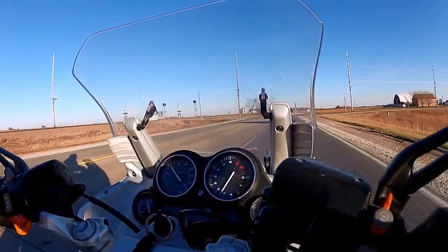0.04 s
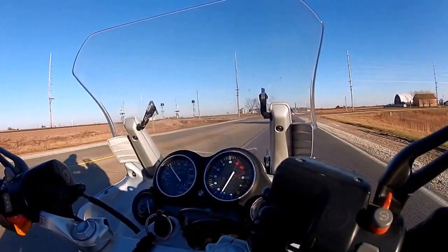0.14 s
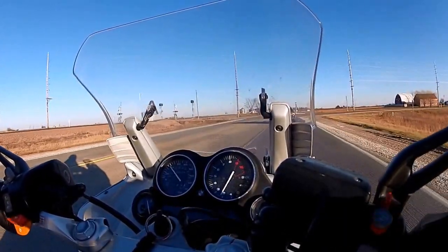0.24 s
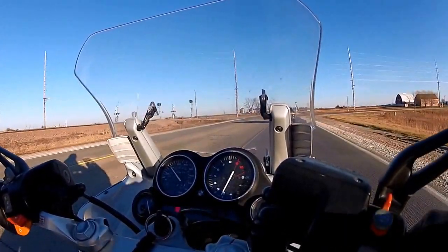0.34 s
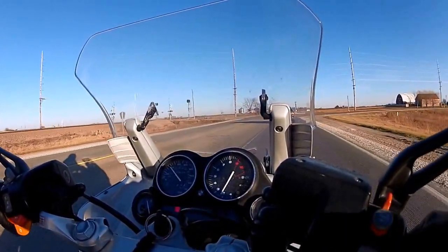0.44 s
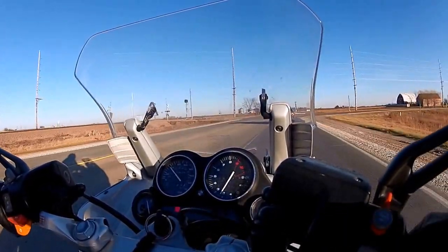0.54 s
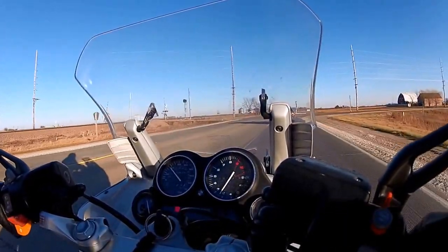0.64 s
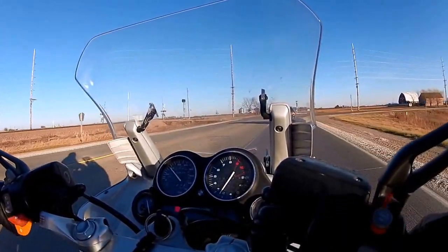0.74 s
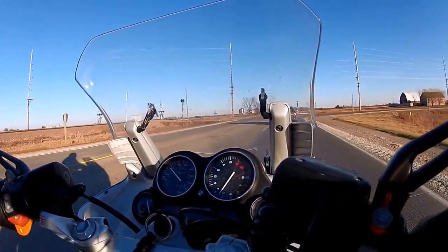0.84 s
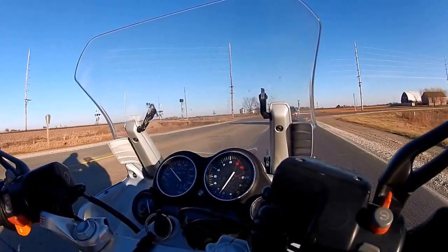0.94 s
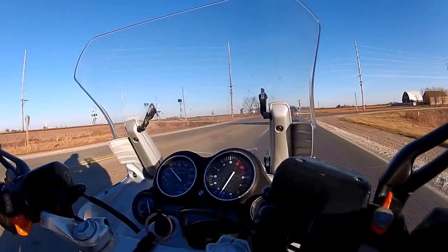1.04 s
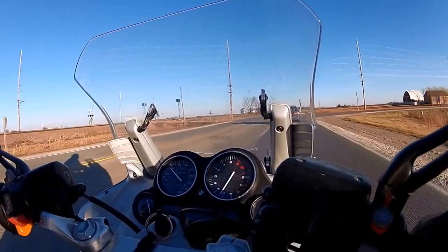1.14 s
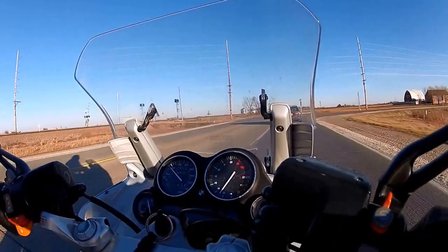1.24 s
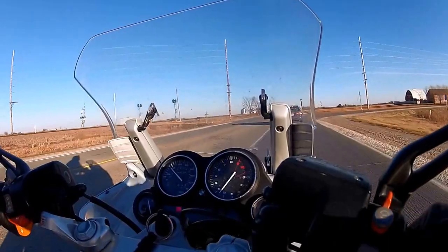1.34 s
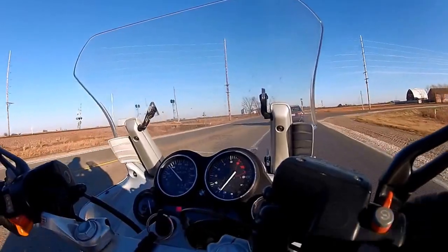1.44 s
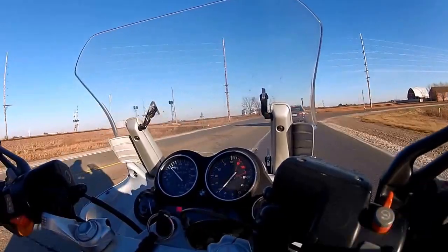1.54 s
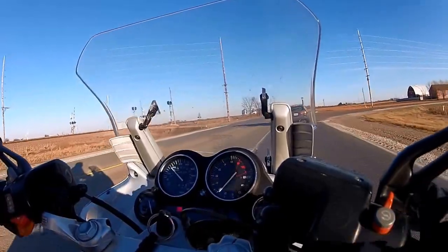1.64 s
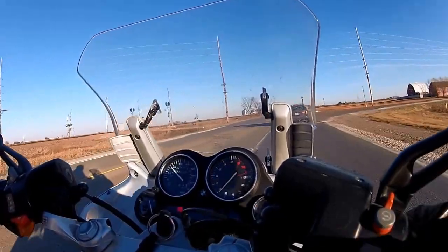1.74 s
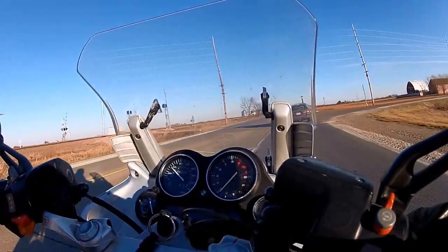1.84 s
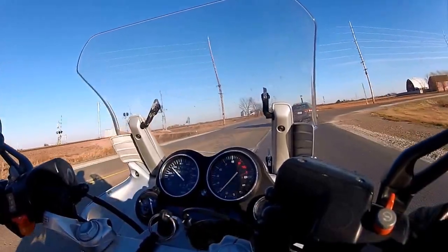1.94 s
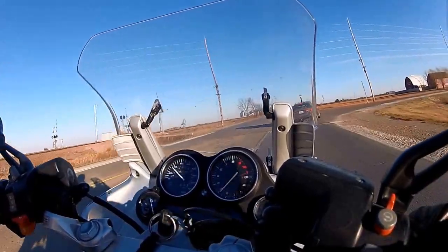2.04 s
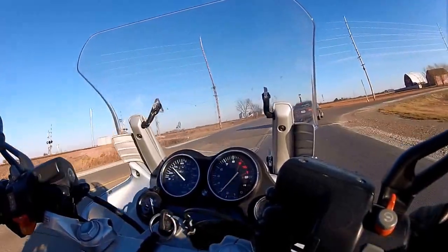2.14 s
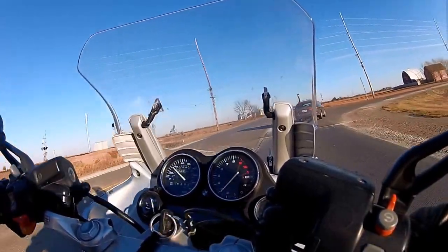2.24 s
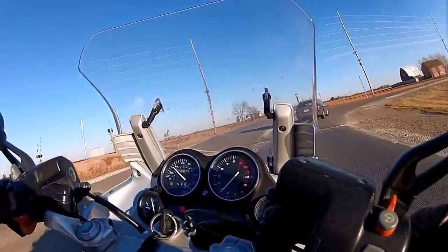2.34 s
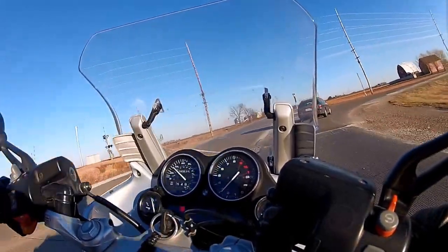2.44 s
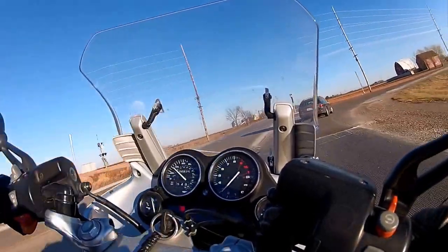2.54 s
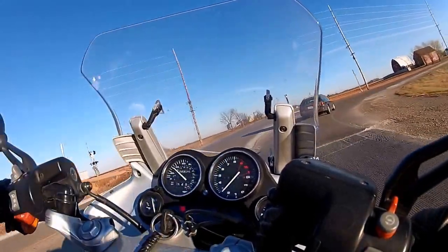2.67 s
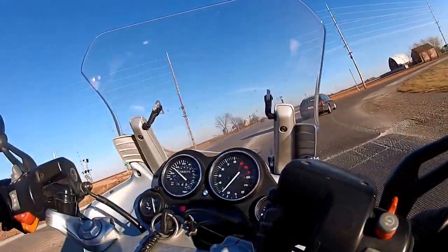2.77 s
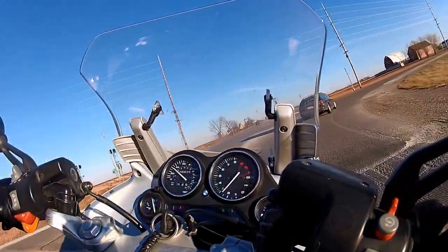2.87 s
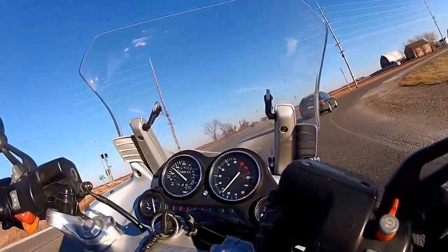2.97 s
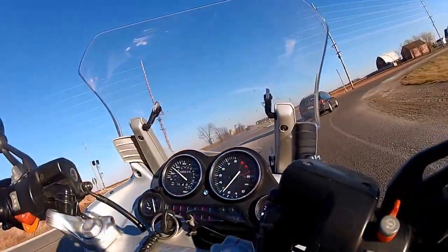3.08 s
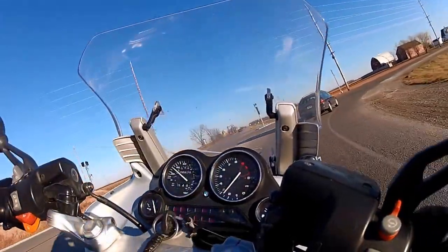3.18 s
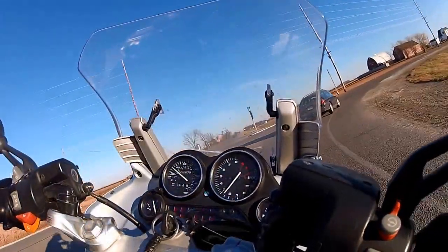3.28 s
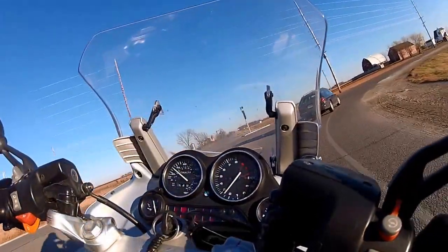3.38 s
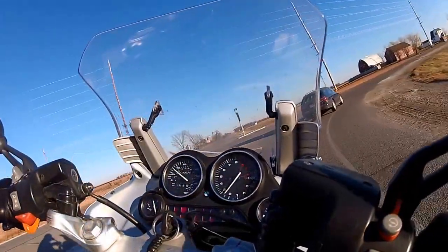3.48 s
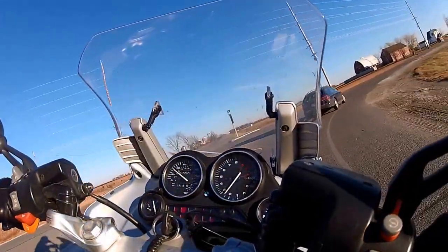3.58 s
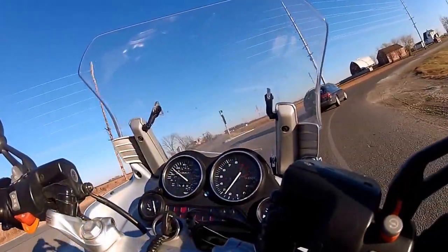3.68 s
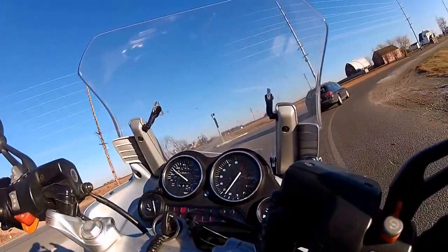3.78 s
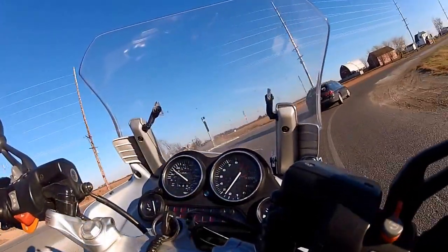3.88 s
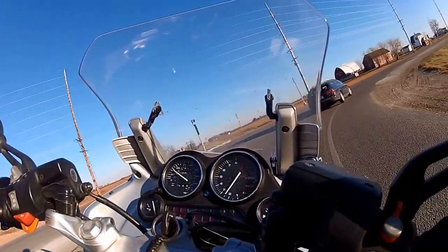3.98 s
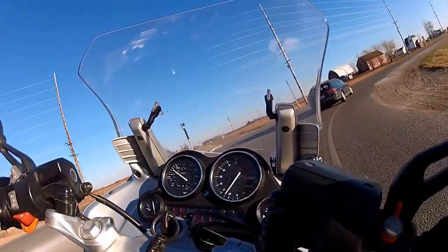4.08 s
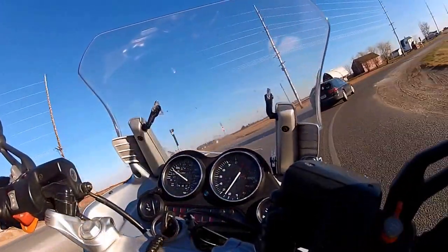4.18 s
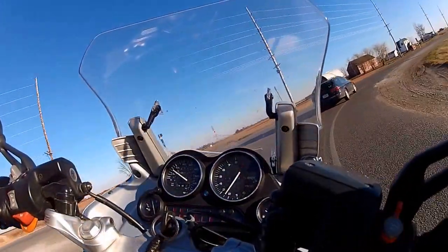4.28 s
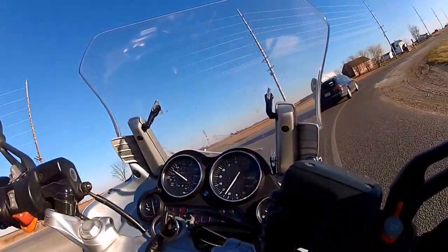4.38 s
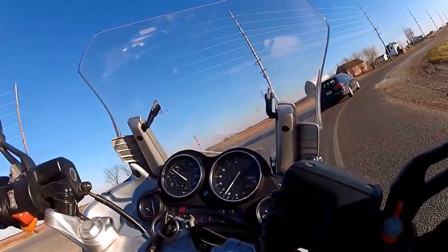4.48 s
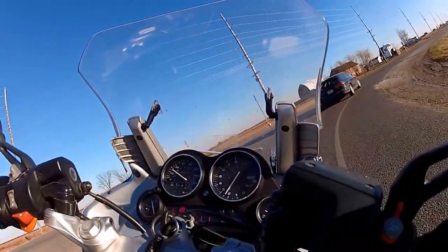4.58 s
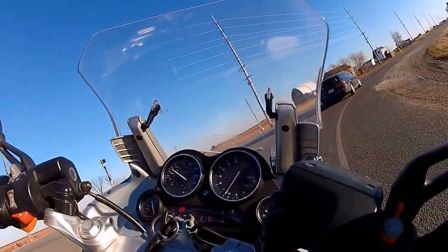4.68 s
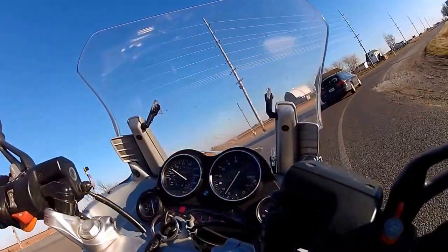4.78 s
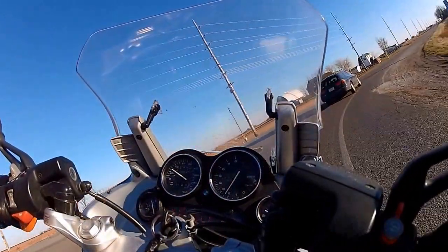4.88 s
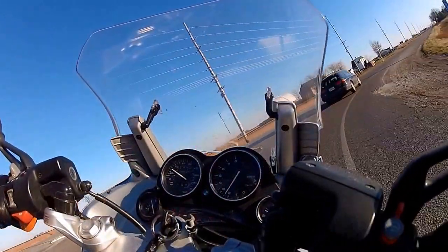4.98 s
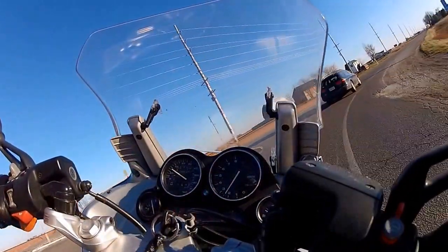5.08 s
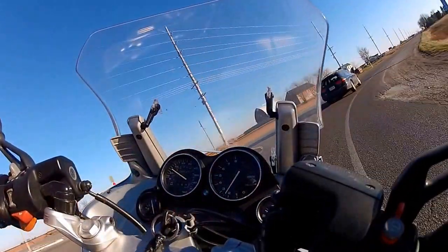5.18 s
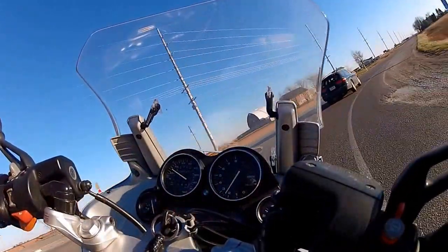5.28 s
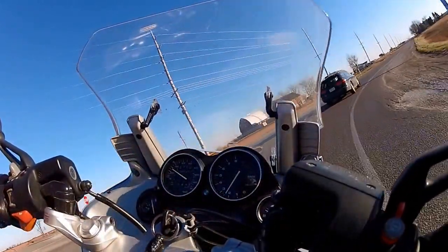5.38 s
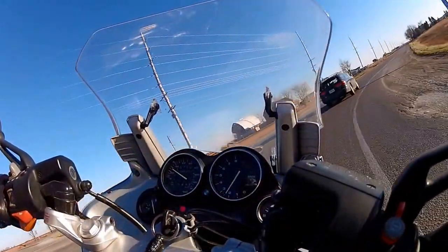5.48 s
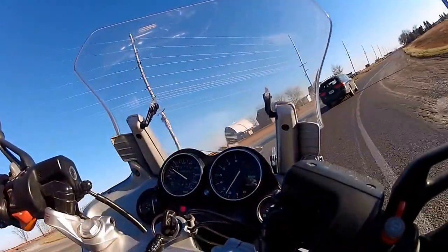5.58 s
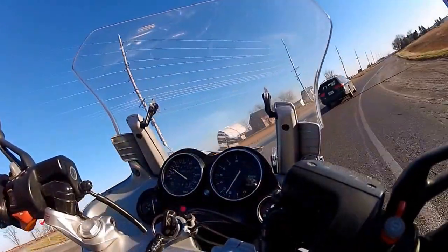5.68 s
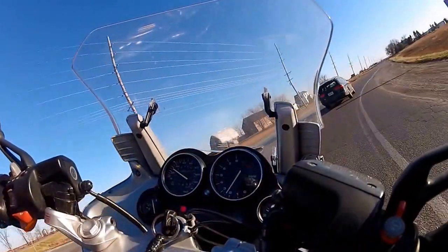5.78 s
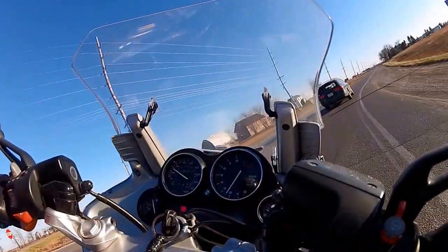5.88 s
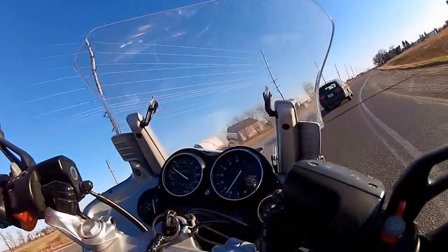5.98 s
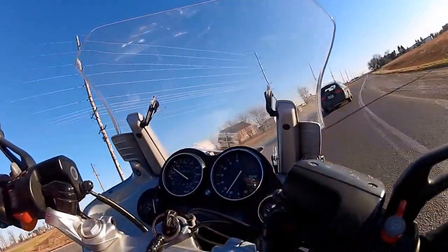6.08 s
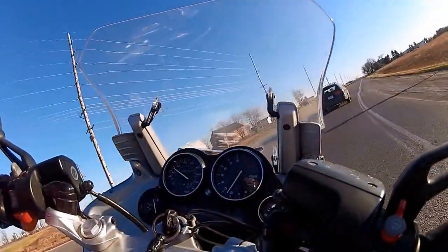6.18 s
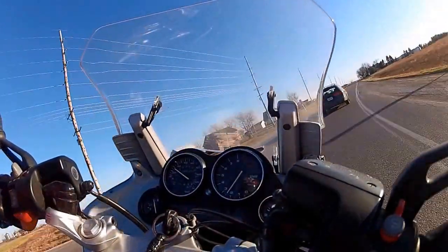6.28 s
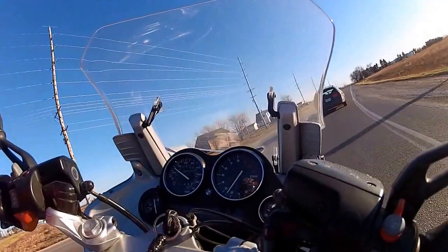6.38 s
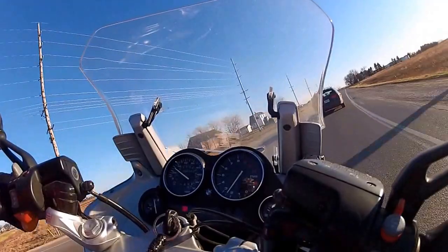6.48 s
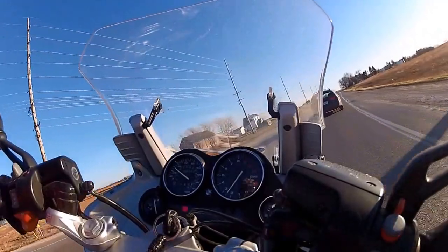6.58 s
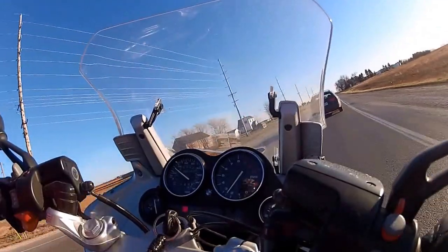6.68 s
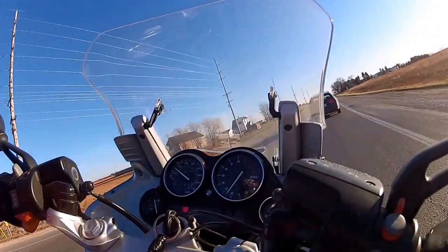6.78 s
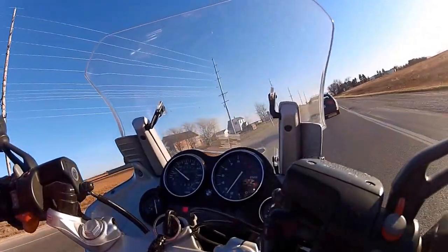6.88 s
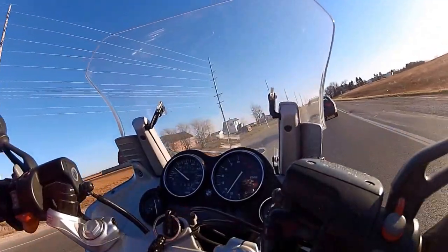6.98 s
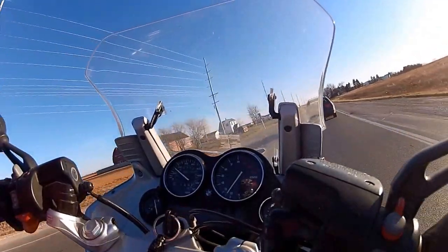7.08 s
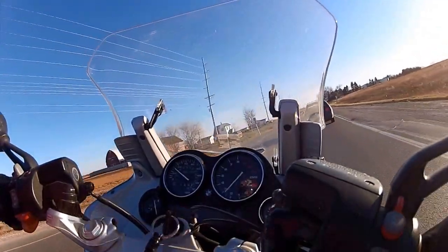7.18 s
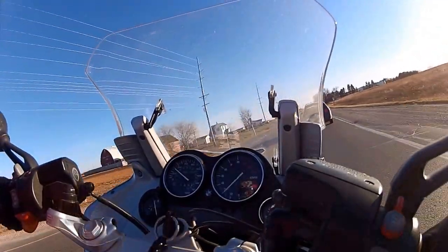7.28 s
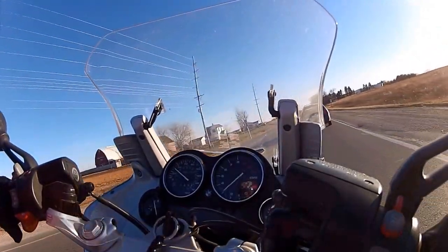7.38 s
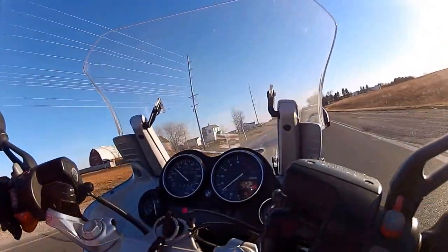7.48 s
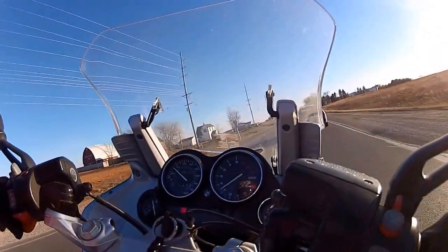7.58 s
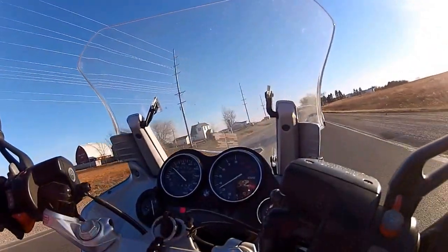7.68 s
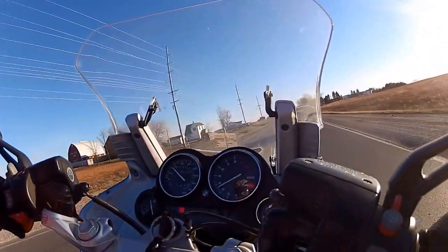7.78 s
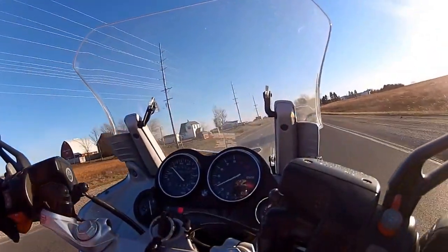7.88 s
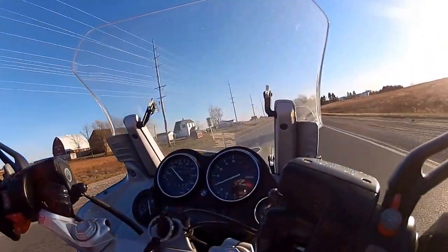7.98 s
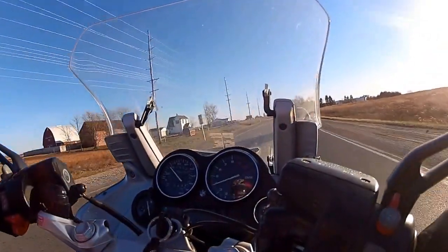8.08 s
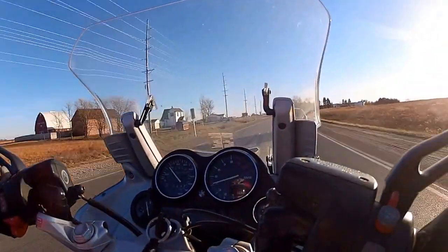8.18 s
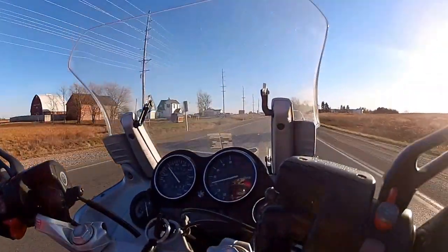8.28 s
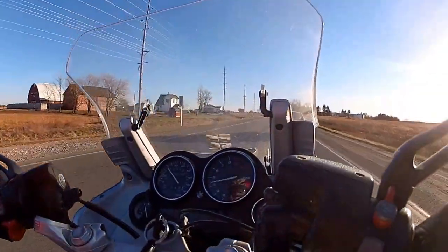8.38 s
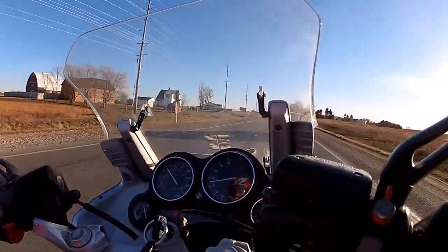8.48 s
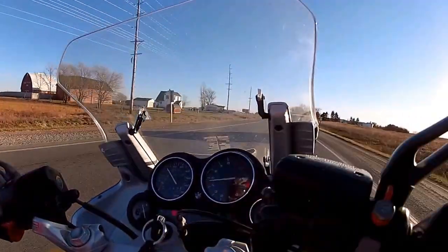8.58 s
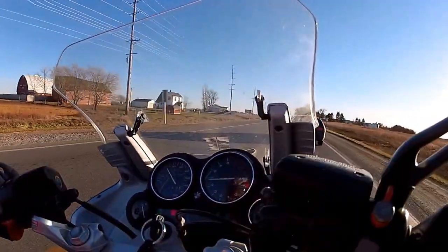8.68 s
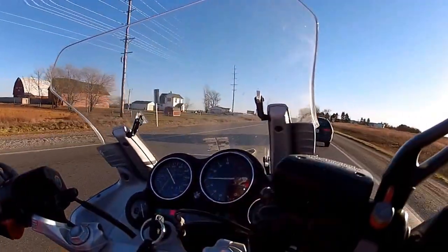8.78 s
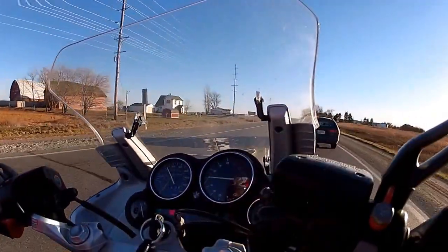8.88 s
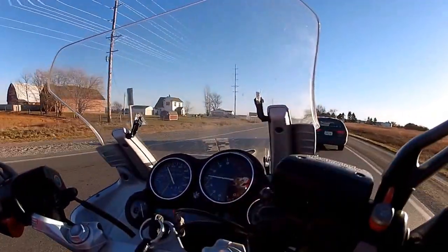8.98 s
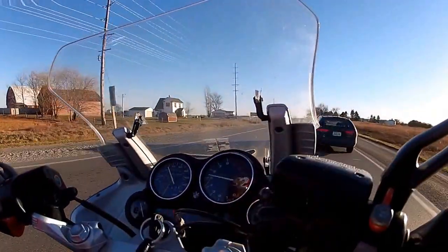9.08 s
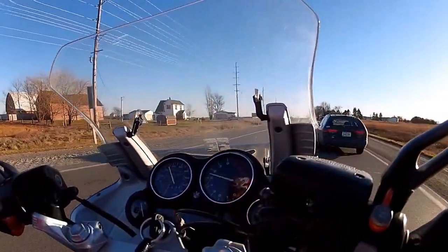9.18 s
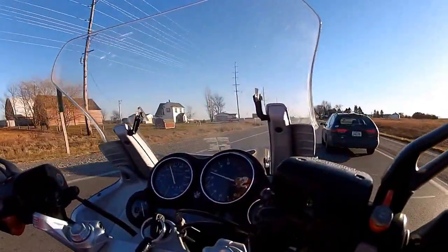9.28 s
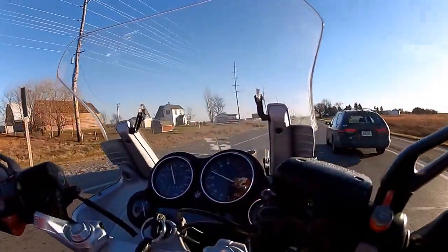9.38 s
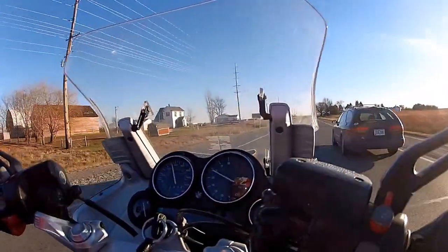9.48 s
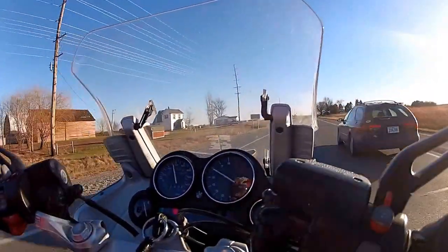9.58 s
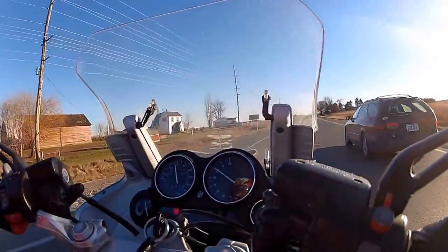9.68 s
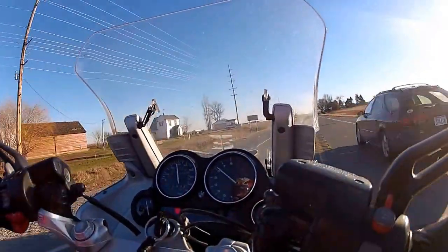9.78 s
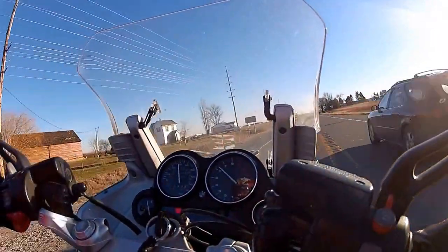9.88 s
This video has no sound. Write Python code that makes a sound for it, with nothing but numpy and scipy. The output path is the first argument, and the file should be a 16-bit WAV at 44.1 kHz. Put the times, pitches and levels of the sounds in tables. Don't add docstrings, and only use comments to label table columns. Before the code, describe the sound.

Boxy onboard sound of a four-cylinder motorcycle: low drone, rattly gear changes, faint whine and ticking, then a strong climbing roar over dull wind buffeting.

```python
import sys
import numpy as np
from scipy import signal
from scipy.io import wavfile
from scipy.ndimage import uniform_filter1d, minimum_filter1d

SR = 44100
rng = np.random.default_rng(int(sys.argv[2]) if len(sys.argv) > 2 else 0)


def magnitude_from_level(level_db):
    exponent = np.asarray(level_db, float) / 20
    return 10 ** exponent


def wav_out(sig):
    wavfile.write(sys.argv[1], SR, np.round(np.clip(np.atleast_2d(sig).T, -1, 1) * 32767).astype(np.int16))


N = 437913
TIME = np.arange(N) / SR


def evened(x):
    return x / np.sqrt(np.mean(x ** 2) + 1e-20)


def curve(table):
    s, value = np.transpose(table)
    return np.interp(TIME, s, value)


def bumps_db(table, half_s, power=2):
    return sum(db * np.exp(-((TIME - s) / half_s) ** power) for s, db in table)


def drift(hz):
    return evened(signal.sosfilt(signal.butter(2, hz, fs=SR, output="sos"), rng.standard_normal(N)))


def resonate(x, hz, width_hz):
    pole = np.exp((2j * np.pi * hz - np.pi * width_hz) / SR)
    for _ in range(2):
        x = 2 * signal.lfilter([1 - abs(pole)], [1, -pole], x).real
    return x


def peaks_db(hz, modes):
    return sum(peak_db / (1 + (2 * (hz - mode_hz) / width_hz) ** 2) for mode_hz, width_hz, peak_db in modes)


# pitch_hz, level_db (per Hz)
HOUSING_TONE = [(160, -29.5), (280, 1), (330, -7.5), (421, -29), (550, -14.5), (617, -15.5), (928, -7.5),
                (1040, -12.5), (1200, -6), (1730, -1), (2450, -9.5), (2640, -12.5), (3590, -26),
                (4080, -29.5), (5900, -31), (7670, -57), (13000, -120)]
# pitch_hz, width_hz, level_db
PANEL_RINGS = [(547, 99, 9), (943, 51, 1.5), (1200, 120, 8), (1310, 38, 4), (1530, 100, 4.5),
               (1750, 180, 1), (2810, 31, 4.5), (3708, 480, 10.5)]


def housing(x):
    hz = abs(np.fft.fftfreq(8192, 1 / SR))
    tone_hz, tone_db = np.transpose(HOUSING_TONE)
    db = np.interp(np.log(hz + 1), np.log(tone_hz + 1), tone_db) + peaks_db(hz, PANEL_RINGS)
    log_gain = np.log(magnitude_from_level(np.maximum(db, -100)))
    impulse = np.fft.ifft(np.exp(np.conj(signal.hilbert(log_gain)))).real[:4096]
    return signal.oaconvolve(x, impulse)[:N]


# start_s, level_db
WIND_BASE = [(0, -28), (3.3, -24), (4.8, -30), (5.8, -32), (7.2, -24), (8.2, -22), (8.8, -42.5),
             (9.93, -40)]
# centre_s, level_db
WIND_GUSTS = [(.02, 3), (.43, 12), (1.08, 8.5), (3.37, 8), (3.78, 8), (4.2, 8), (6.22, 9), (6.7, -2),
              (7.15, -1), (.7, 5), (7.5, 0), (7.8, 5), (8.08, 3), (9.1, 18.5), (9.57, 21)]


def wind():
    level_db = curve(WIND_BASE) - 1.5 * drift(5.4) + bumps_db(WIND_GUSTS, half_s=0.1)

    def band(edges_hz):
        sos = signal.butter(2, edges_hz, "bandpass", fs=SR, output="sos")
        return evened(signal.sosfilt(sos, rng.standard_normal(N)))

    low, drone = band([18, 49.4]), band([70, 146])
    return magnitude_from_level(level_db) * low + magnitude_from_level(0.17 * level_db - 24.0) * drone


# start_s, level_db
ROAD_SHAKE = [(0, -30), (.06, -11.5), (1.3, -12), (3, -13.5), (3.9, -12), (4.7, -10.5), (5.3, -13),
              (7.05, -12), (7.1, -11.5), (7.3, -6), (7.35, -13.5), (7.6, -11), (8.3, -12.5), (8.5, -14.5),
              (9.1, -14), (9.4, -17.5), (9.93, -29)]
# centre_s, level_db
SMOOTH_ROAD = [(.27, -7), (0.861, -8), (1.75, -4), (2.32, -10), (2.59, -16), (2.83, -7), (4.08, -4),
               (4.71, -14), (4.85, -9), (5.04, -6), (5.58, -5.5), (6.36, -15.5), (6.9, -5), (7.02, -8)]
# pitch_hz, width_hz, level_db
BOOM_TUNING = [(204.6, 29.5, 9), (264, 105, -17.5), (315.3, 28, -11), (118, 34, -3)]


def road_boom():
    level_db = curve(ROAD_SHAKE) + 1.17 * drift(7.1) + bumps_db(SMOOTH_ROAD, half_s=0.03)
    shake = rng.standard_normal(N) * magnitude_from_level(0.59 * drift(31))
    ring = sum(magnitude_from_level(db) * evened(resonate(shake, hz, 1.38 * width_hz)) for hz, width_hz, db in BOOM_TUNING)
    return magnitude_from_level(level_db - 3.5) * evened(ring)


# start_s, pitch_hz, peak_db, t60_s
BOOM_JOLTS = [
    (.14, 344, -11.5, 0.062),
    (0.333, 202.3, -7, 0.11),
    (6.846, 200, 3, 0.084),
    (6.939, 199, -3, 0.084),
    (7.088, 202.2, 2.5, 0.13),
    (7.235, 218.8, 9, 0.16),
]


def jolts():
    out = np.zeros(N)
    for s, hz, db, t60_s in BOOM_JOLTS:
        t = np.maximum(TIME - s, 0)
        swing = magnitude_from_level(db - 60 * (t / t60_s) ** 1.45) * (1 - np.exp(-t / 0.0035))
        out += swing * np.sin(2 * np.pi * hz * t)
    return out


# start_s, peak_db, ring_hz, sharpness (0-1)
RATTLES = [(0.311, -1, 2200, 0), (0.428, -8, 1750, 0), (0.994, -5, 1530, 0), (1.046, -11, 1630, 0.2),
           (1.128, -8, 1750, 0), (1.147, -6.5, 1660, 0), (1.202, -9.5, 1650, .3), (2.802, -6.5, 1260, 0.2),
           (3.128, -11, 1520, 0.57), (3.141, -6, 1530, 0), (3.174, -11, 1750, 0.6), (3.199, -15, 1190, 0.5),
           (3.286, -15.5, 1570, .5), (3.327, -14.5, 1100, 1), (3.387, -9, 1210, 0.3), (5.048, -19, 1360, 0),
           (6.151, -16, 1310, 0.1), (6.784, -12, 1530, 0), (6.833, -2, 1630, 0.03), (6.875, -8, 1300, 0),
           (6.926, -8.5, 1510, 0.2), (7.063, -8, 1560, .06), (7.091, -8, 1530, 0), (7.149, -3, 1770, 0),
           (7.208, -6.5, 1450, 0.2), (7.233, -6, 1240, 0.3), (7.388, -19, 1230, 0.9), (8.281, -7, 1200, 0)]
# start_s, peak_db, ring_hz, sharpness (0-1)
MORE_RATTLES = [
    (.154, -6, 1750, .08),
    (.168, -11, 950, .1),
    (6.831, -4, 2150, .6),
    (.309, -7, 2300, .6),
]


def knocks():
    events = list(RATTLES) + list(MORE_RATTLES)
    rebounds_s = rng.uniform(0.0057, 0.01, len(events))
    t = np.arange(SR // 6) / SR
    rattle, rings = np.zeros(N + SR), np.zeros(N + SR)
    for (s, db, hz, sharp), late_s in zip(events, rebounds_s):
        span = slice(round(s * SR), round(s * SR) + len(t))
        blow = magnitude_from_level(-60 * t / 0.02)
        rebound = 0.4 * magnitude_from_level(-60 * abs(t - late_s) / 0.02) * (t >= late_s)
        tail = 0.5 * magnitude_from_level(-60 * t / 0.13)
        attack = 1 - np.exp(-t / 0.0009)
        shaken = magnitude_from_level(db) * (blow + rebound + tail) * rng.standard_normal(len(t)) * attack
        treble = np.diff(shaken, prepend=0) * magnitude_from_level(-60 * t / 0.058)
        rattle[span] += shaken + 8 * abs(sharp) * treble
        rings[span] += 2.2 * resonate(shaken, hz, 350)
    white = np.std(housing(rng.standard_normal(N)))
    return rings[:N] + magnitude_from_level(-8.5) * housing(rattle[:N]) / white


# start_s, firing_hz
ENGINE_SPEED = [(0, 82), (.47, 86.8), (.69, 85.3), (1.05, 80), (1.19, 99.9), (2, 95.5), (3, 87.7),
                (3.6, 82.3), (4.2, 79.6), (5.1, 78), (5.8, 81), (6.6, 85.8), (7.03, 85), (7.16, 121.7),
                (7.27, 115.3), (8.1, 144.3), (9.15, 196.5), (9.93, 226.8)]
# pulled_s, bites_s, sag_hz, catch_s
CLUTCH_PULLS = [
    (0, .31, 27.5, .07),
    (.86, 1.05, 17.5, .14),
    (6.76, 6.99, 13, .17),
]


def speed():
    hz = curve(ENGINE_SPEED)
    for pulled_s, bites_s, sag_hz, catch_s in CLUTCH_PULLS:
        sag = np.interp(TIME, [pulled_s, bites_s, bites_s + catch_s], [0, 1, 0])
        hz = hz - sag_hz * np.sin(np.pi / 2 * sag)
    return hz


# centre_s, half_s, level_db
BUZZ_SPELLS = [
    (1.65, 0.32, 15.5),
    (2.62, 0.12, 12),
    (6.2, 0.091, 11.5),
    (7.6, 0.85, 8.5),
    (9.4, 0.068, 0.5),
    (8.76, 0.24, 4.5),
    (9.812, 0.25, -6.5),
]
# start_s, peak_db
BRIGHT_TICKS = [(1.383, -13), (1.384, -12), (1.445, -11), (1.5046, -28), (1.5164, -18), (1.539, -16),
                (1.6171, -27), (1.659, -18), (1.721, -15), (1.76, -22), (1.801, -22), (1.85, -22),
                (1.58, -22), (1.95, -22), (2.53, -24), (2.572, -20), (2.63, -26), (2.77, -19), (6.34, -22)]
# pitch_hz, width_hz, level_db
SMALL_PARTS = [(3390, 900, 9.5), (4430, 160, -1.5), (4970, 1600, -5.5)]


def ticking(turns, firing_hz, rise_db):
    spells_db = sum(bumps_db([(s, db)], half_s, power=4) for s, half_s, db in BUZZ_SPELLS)
    level_db = -64 + 0.6 * rise_db + 0.2167 * (firing_hz - ENGINE_SPEED[0][1]) + spells_db
    firing = np.floor(turns).astype(int)
    strength = magnitude_from_level(5.2 * np.minimum(rng.exponential(1, N), 3.6))[firing] * np.exp(-(turns % 1) / 0.18)
    strength *= (90 / (np.gradient(turns) * SR)) ** 2
    drive = magnitude_from_level(level_db + 6.0) * evened((0.54 + strength) * rng.standard_normal(N))
    for s, db in BRIGHT_TICKS:
        drive += magnitude_from_level(db - 8.5 - 60 * abs(TIME - s) / 0.012) * (TIME > s) * np.sign(drive)

    def ring(x):
        return sum(magnitude_from_level(db) * resonate(x, hz, width_hz) for hz, width_hz, db in SMALL_PARTS)

    return ring(drive) / np.std(ring(rng.standard_normal(SR)))


# start_s, end_s, order (of the firing rate), level_db
GEAR_WHINES = [(2.3, 3.25, 6, -32), (3.3, 4.3, 8, -43), (5.9, 6.5, 8, -47), (1.2, 3.3, 8.45, -40),
               (.36, .95, 30.6, -34), (2.5, 3.2, 29.5, -43), (1.9, 3.4, 30.4, -39), (3.3, 4.6, 32.45, -37),
               (2.8, 3.9, 31.5, -42), (4.9, 6.9, 31.5, -40.5), (5.4, 6.6, 15.9, -35),
               (5.6, 6.4, 23.85, -41), (6.955, 7.04, 30.6, -28), (7.35, 8, .32, -15),
               (7.6, 8.15, 6.72, -24), (7.68, 8.05, 32, -40.5), (7.9, 8.36, 32, -49),
               (7.33, 7.41, 32.7, -34), (7.405, 7.56, 31.4, -35), (7.15, 7.19, 34.8, -43),
               (7.175, 7.25, 32, -36), (1.1, 2, 1.69, -21), (1, 3.3, .31, -24), (7.9, 8.35, 1.36, -19),
               (7.3, 7.9, 1.5, -21), (9.05, 9.4, 6, -30), (8.5, 8.9, 3, -25), (9.45, 9.93, 3, -33),
               (7.35, 7.8, 3, -29), (8.5, 9.4, 1.25, -26)]


def whines(turns):
    out, waver = np.zeros(N), magnitude_from_level(1.6 * drift(18))
    turns = turns + 0.0028 * drift(70)
    for start_s, end_s, order, db in GEAR_WHINES:
        span = slice(round(start_s * SR), round(end_s * SR))
        fade = signal.windows.tukey(len(turns[span]), 0.6)
        tone = np.cos(2 * np.pi * order * turns[span]) * fade
        out[span] += magnitude_from_level(db) * np.roll(waver, span.start)[span] * tone
    return out


QUARTER_DB = [3, -3, 0, -3]


def cycle(turns):
    swell, out = magnitude_from_level(5 * drift(4)), np.zeros(N)
    for k, (shift, phase) in enumerate(rng.random((36, 2)), 9):
        tone = np.cos(2 * np.pi * (k / 4 * turns + phase))
        out += magnitude_from_level(QUARTER_DB[k % 4] - 0.25 * k) * np.roll(swell, int(shift * N)) * tone
    return out


# start_s, opening (0-1)
THROTTLE_OPEN = [(0, .4), (7.1, .4), (7.45, .55), (8.5, .6), (9.3, .62), (9.93, .66)]


def clatter(turns, level_db):
    puffs = (3.3 + np.exp(-(turns % 1) / 0.43)) * rng.standard_normal(N)
    puffs *= magnitude_from_level(0.86 * drift(12.2))
    clean = curve(THROTTLE_OPEN)
    mix = clean * evened(housing(cycle(turns))) + np.sqrt(1 - clean ** 2) * evened(housing(puffs))
    return magnitude_from_level(level_db + 1.1) * mix


# order (of the firing rate), cruise_db, throttle_db (change per unit of opening above cruise)
ENGINE_ORDERS = [(1, -18.5, -5), (2, -30, 32.5), (2.5, -32, -40), (3, -35.5, 10)]
# pitch_hz, width_hz, level_db
FRAME_MODES = [(73.1, 11.4, 3.5), (95.2, 3.6, -8.5), (124, 21, -1), (157.8, 12.2, -21), (200, 92.5, 14),
               (203.05, 10, 6.5), (262.3, 16.6, 10), (331.6, 10, 12.5), (236.3, 17, 2.5),
               (276.8, 23, -14.5), (417, 155, -5), (137.8, 4.9, -20), (267.6, 10, 5), (196.9, 5.8, -3.5)]
# start_s, level_db
FIRING_LOAD = [(0, -6), (.35, -1.5), (1, -2), (1.1, -2), (1.22, 1), (1.75, -1.5), (2.2, 0), (2.45, -4.5),
               (3.1, -2.5), (3.2, 0.5), (3.5, -0.5), (6.6, -1.5), (7.3, -3.7), (8.1, 5.5), (8.34, -1.5),
               (8.6, 6), (9.45, 2), (9.55, 0.5)]


def orders(turns, firing_hz):
    opened = curve(THROTTLE_OPEN) - THROTTLE_OPEN[0][1]
    out = np.zeros(N)
    for order, cruise_db, throttle_db in ENGINE_ORDERS:
        hz = order * firing_hz
        frame_db = peaks_db(hz, FRAME_MODES)
        frame_db -= 34 * np.maximum(np.log2(hz / 280.5), 0)
        level_db = cruise_db + throttle_db * opened + frame_db + curve(FIRING_LOAD)
        level_db += 0.8 * drift(2) + 0.9 * drift(25)
        out += magnitude_from_level(level_db) * np.cos(2 * np.pi * order * turns)
    return np.sqrt(2) * out


# start_s, clatter_db
EFFORT = [(0, -29.5), (.5, -26), (1, -26.5), (1.3, -22.5), (2.4, -25), (3.3, -26.5), (4.2, -27.5),
          (5.4, -31.5), (6.2, -29), (7, -27), (7.36, -23), (7.47, -18.5), (8.1, -17), (9, -20), (9.32, -20),
          (9.57, -27.5), (9.79, -22), (9.93, -20.5)]


def engine():
    firing_hz, effort_db = speed(), curve(EFFORT)
    turns = np.cumsum(firing_hz) / SR
    tones = orders(turns, firing_hz) + whines(turns)
    return tones + clatter(turns, effort_db) + ticking(turns, firing_hz, effort_db - EFFORT[0][1])


def scene():
    return (wind() + road_boom() + jolts() + knocks() + engine())[None]


def low_pass(x):
    return signal.sosfilt(signal.butter(12, 15710, fs=SR, output="sos"), x)


def record(dry):
    gain = minimum_filter1d(1.08 / np.maximum(abs(dry[0]), 1.08), size=500)
    limited = dry[0] * uniform_filter1d(gain, size=400)
    limited = signal.oaconvolve(limited, signal.firwin(401, 5920, fs=SR), "same")
    slow = np.clip(signal.resample_poly(limited, 40, 147), -1, 1)
    held = signal.resample_poly(np.repeat(slow, 4), 147, 160)[:N]
    held = np.pad(held, (0, N - len(held)))
    treble_edge = signal.firwin(255, 15400, window=("kaiser", 9), fs=SR)
    held = np.clip(signal.oaconvolve(held, treble_edge, "same"), -1, 1)
    return low_pass(held[None])


dry = scene()
out = record(dry)
wav_out(out)
```